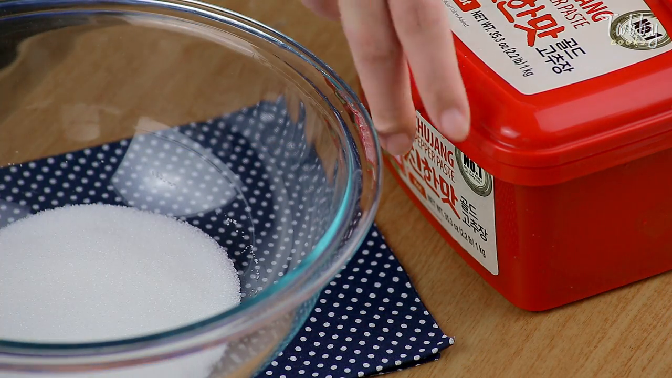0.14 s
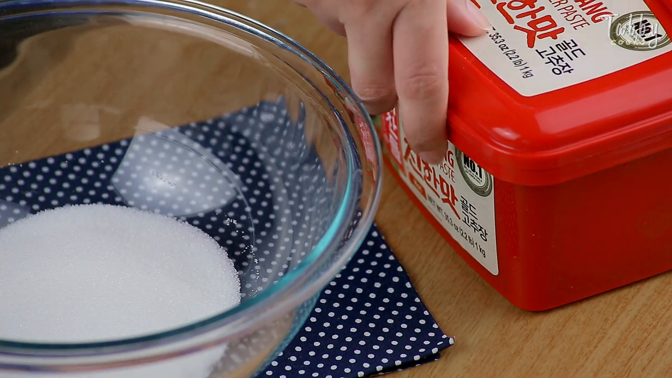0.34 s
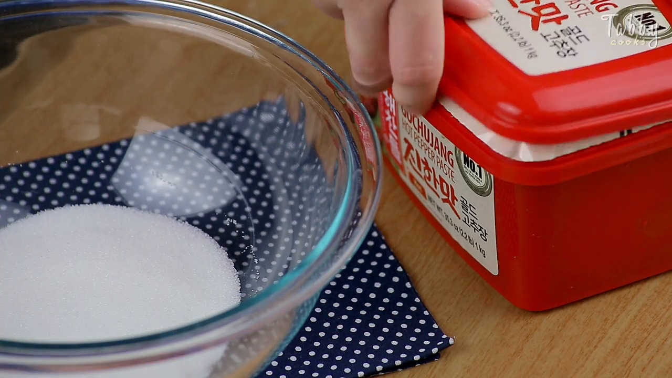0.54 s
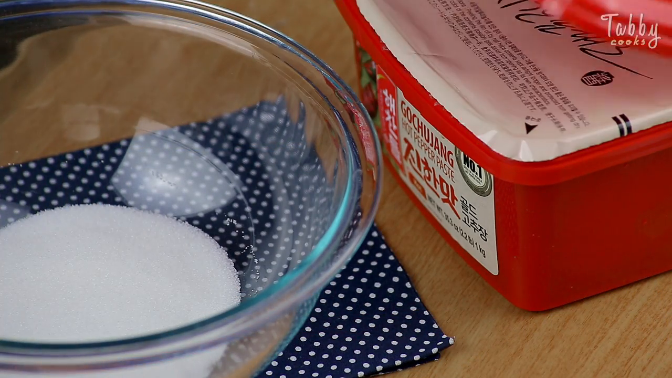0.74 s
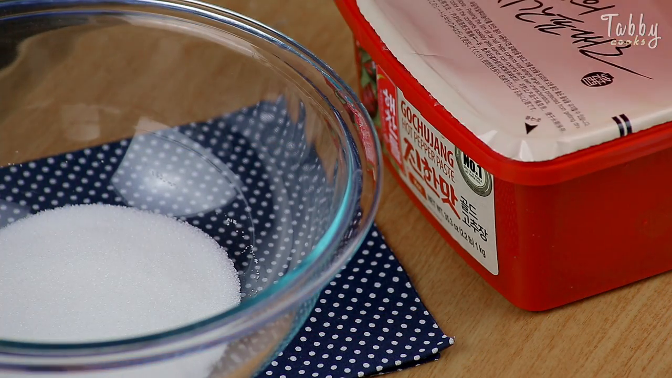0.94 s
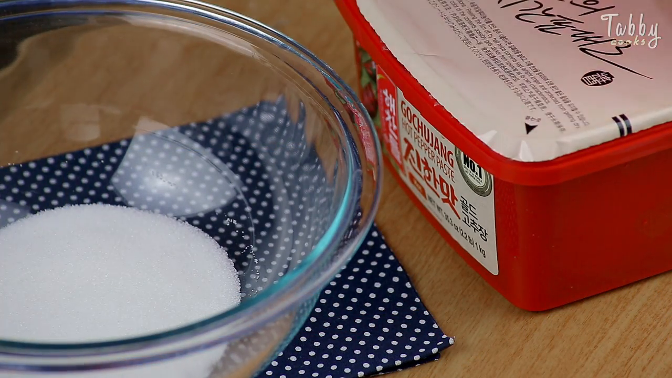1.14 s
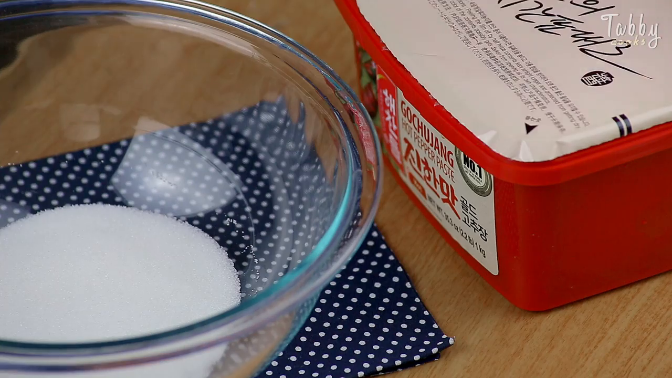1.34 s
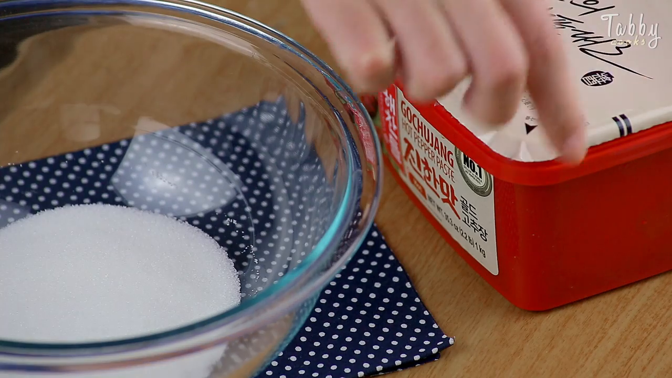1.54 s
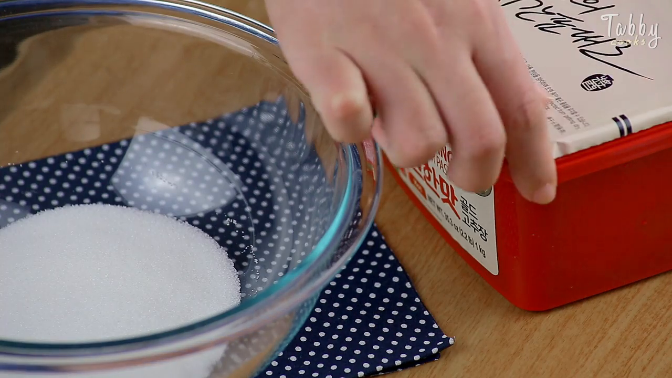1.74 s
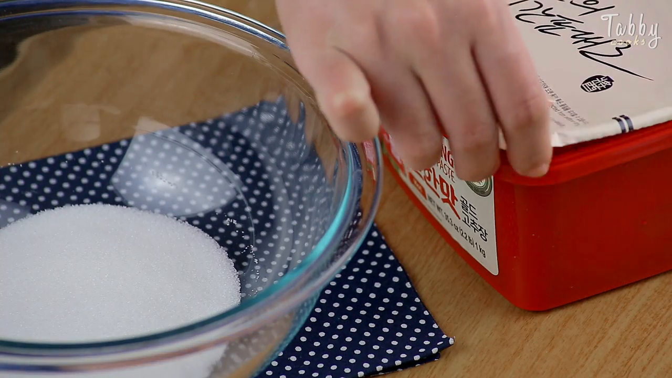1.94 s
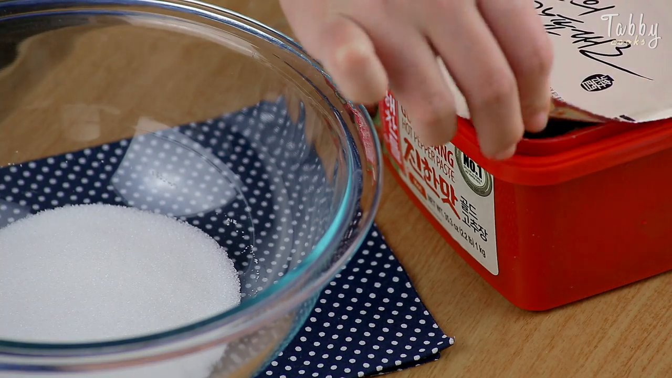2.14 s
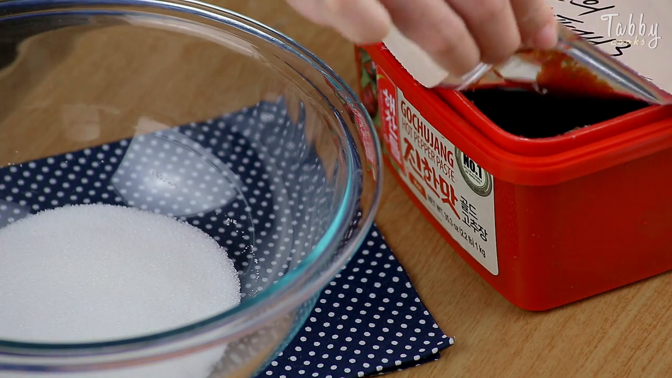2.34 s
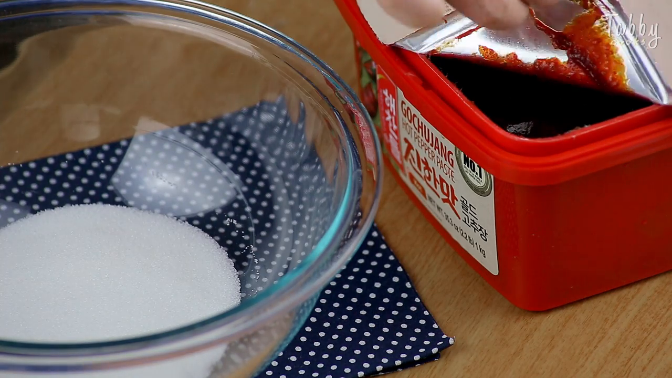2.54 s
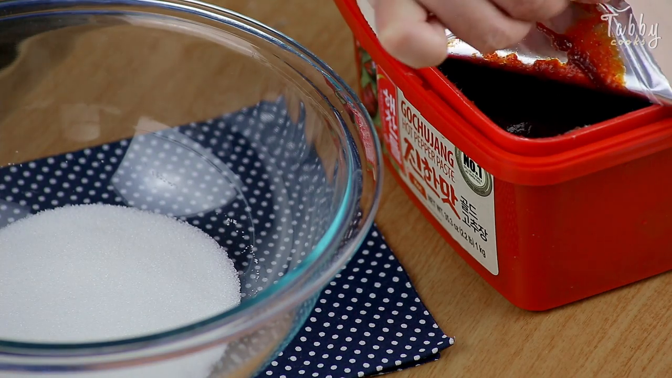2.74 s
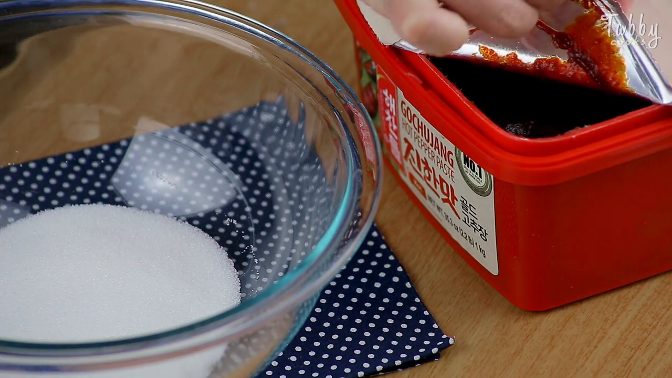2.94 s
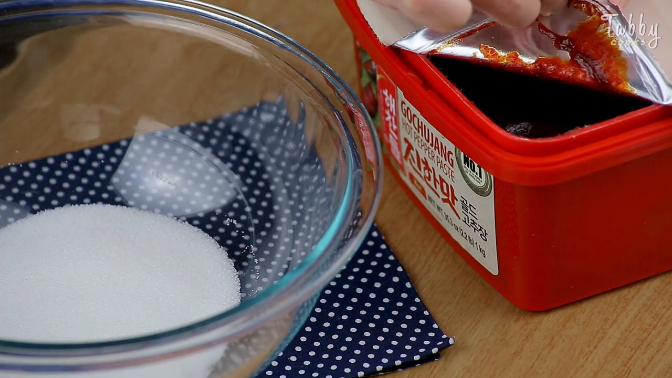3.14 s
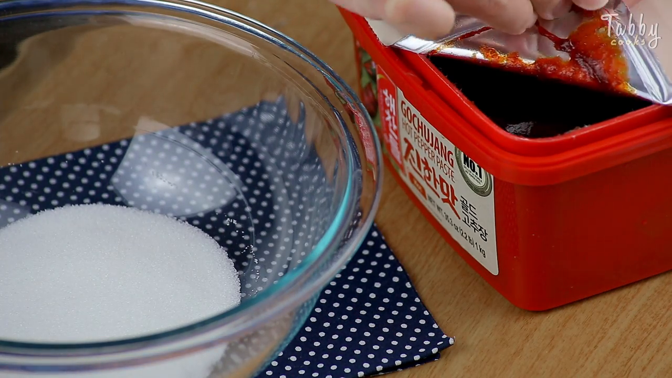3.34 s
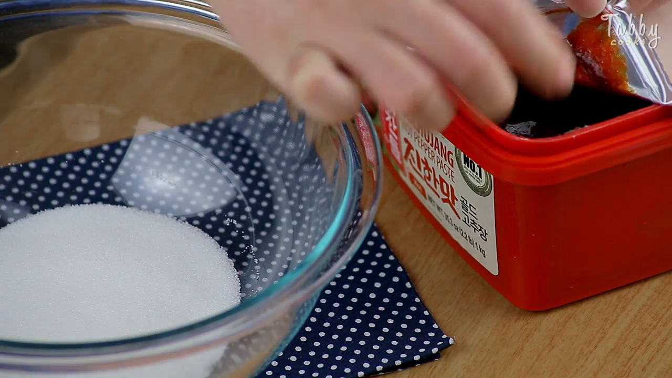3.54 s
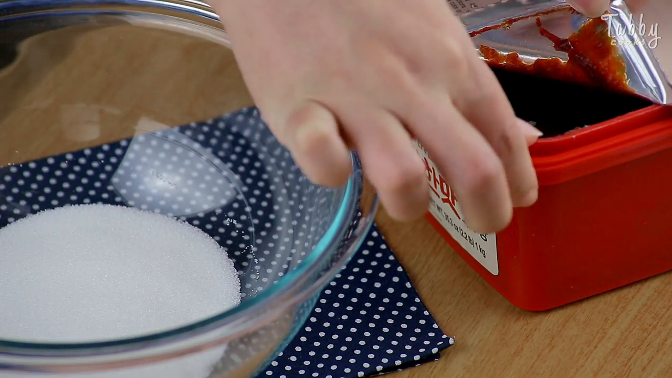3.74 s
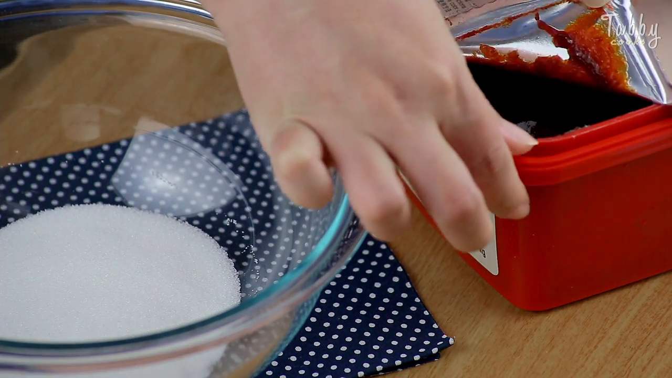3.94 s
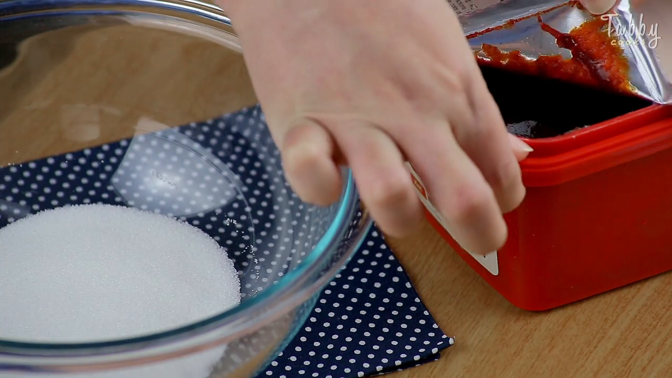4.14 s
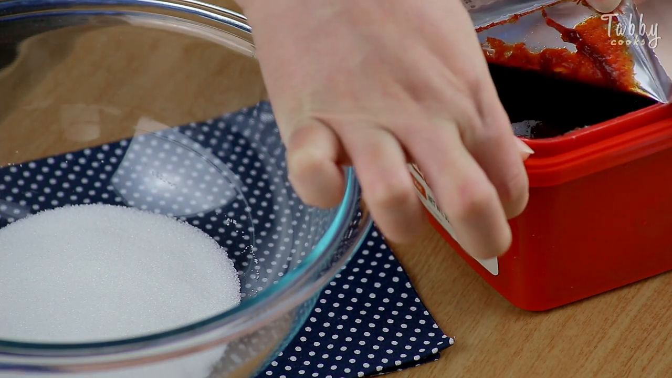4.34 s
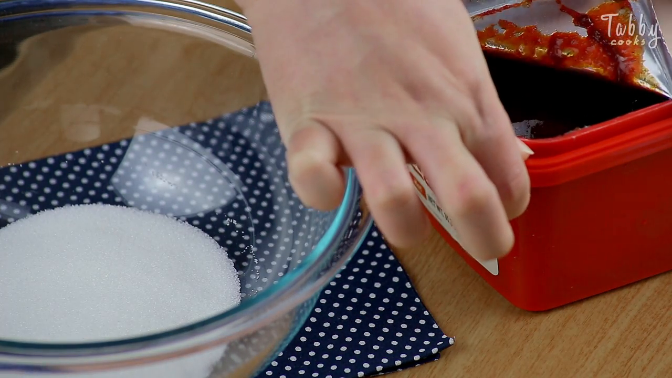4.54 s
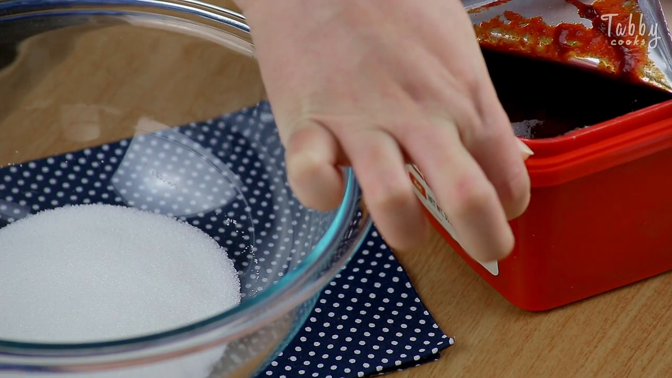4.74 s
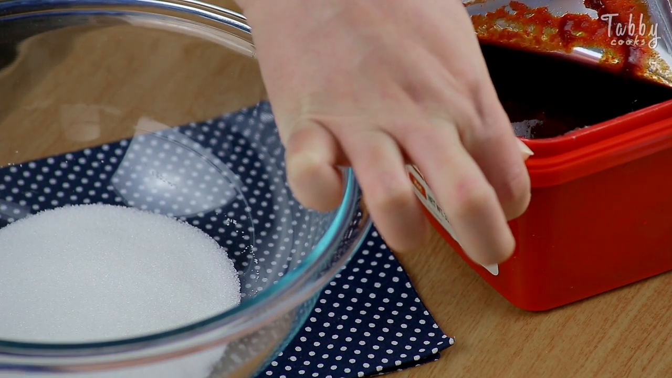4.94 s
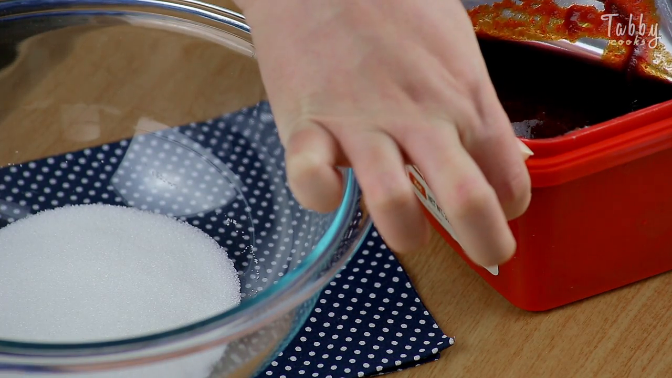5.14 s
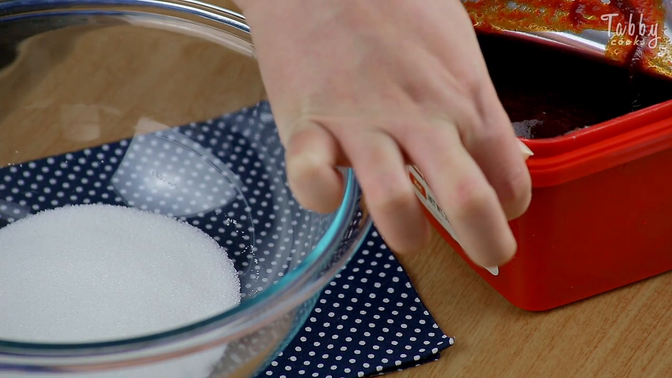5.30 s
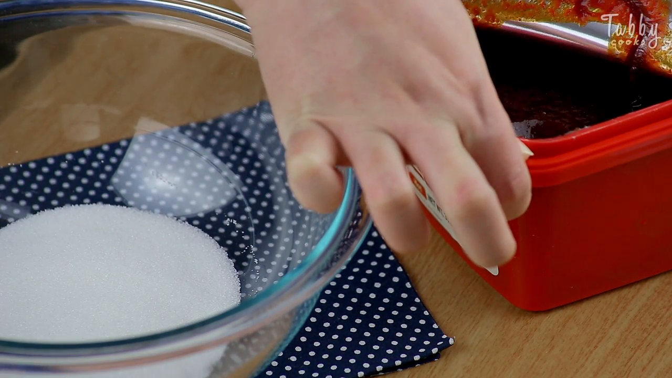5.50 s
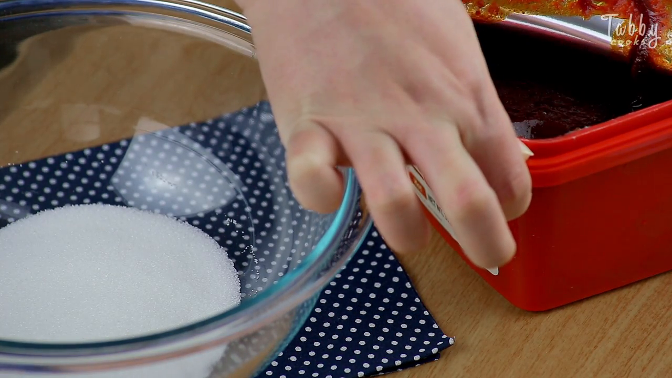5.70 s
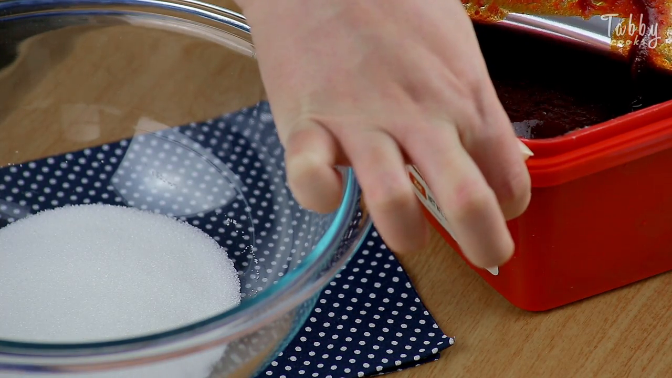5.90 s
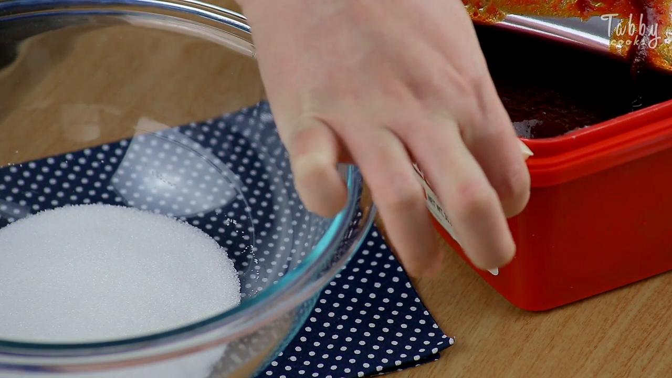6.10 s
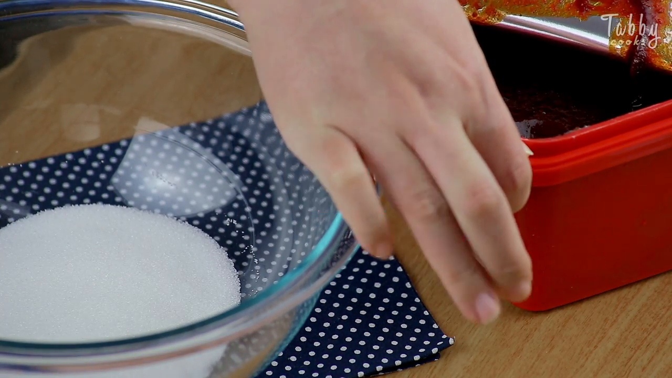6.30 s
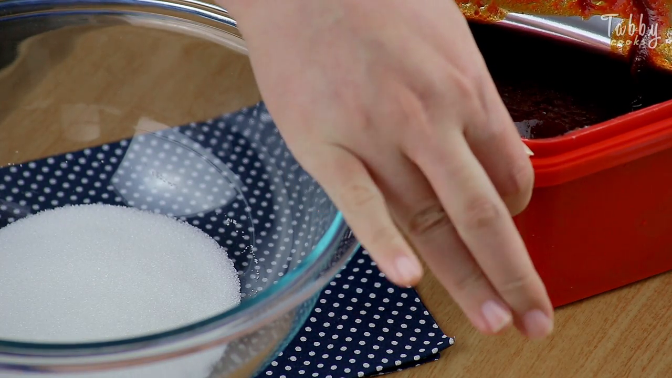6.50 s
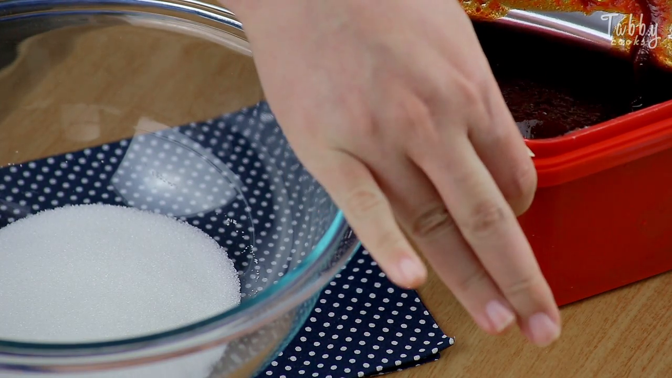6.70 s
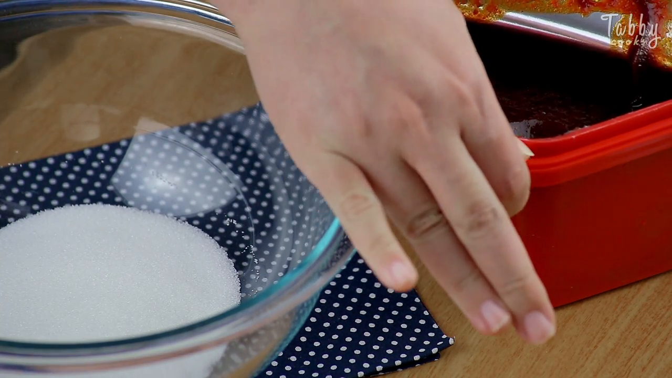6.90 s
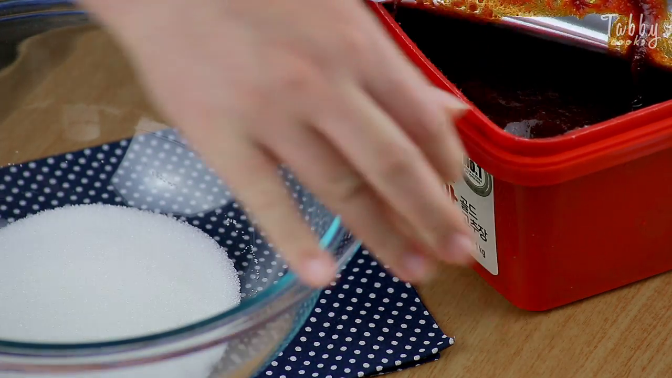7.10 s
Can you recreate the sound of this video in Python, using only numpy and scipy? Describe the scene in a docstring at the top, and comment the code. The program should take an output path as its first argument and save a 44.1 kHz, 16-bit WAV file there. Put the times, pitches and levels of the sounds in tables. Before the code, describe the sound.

A plastic tub is opened up close: the lid rubs off, then foil snaps loose and crinkles in tugs over dull table bumps.

```python
"""Unsealing a plastic tub

Close up on a kitchen table, a lid slides off with a hiss and a groan, and fingers pick at the rim.
The foil seal snaps loose and peels back in crackling tugs while the tub's walls flex and knock.
Every push thumps the table, which sways and booms underneath; a small room answers."""
import sys
import numpy as np
from scipy import signal
from scipy.fft import rfft, irfft, next_fast_len
from scipy.io import wavfile
from scipy.ndimage import uniform_filter1d

SR = 44100
rng = np.random.default_rng(int(sys.argv[2]) if len(sys.argv) > 2 else 0)


def unload_wav(signal):
    """Save mono or channel-first audio to the path in sys.argv[1] as 16-bit WAV at rate SR, clipped to [-1, 1]."""
    wavfile.write(
        sys.argv[1],
        SR,
        np.round(np.clip(np.atleast_2d(signal).T, -1, 1) * 32767).astype(np.int16),
    )


N = 315749

# colour of the room tone: freq_hz, gain_db
ROOM_TONE_EQ = [(59, -43), (100, 0), (124, -1), (166, -11), (215, -13.5), (621, -20.5), (950, -19),
                (1150, -21.5), (2690, -21), (3320, -36), (16000, -46)]
# fader moves of the faint opening hiss: time_s, gain_db
HISS_FADE = [(0, -82), (1.1, -77.5), (1.7, -87)]
# colour of that hiss: freq_hz, gain_db
HISS_EQ = [(2000, -20.5), (3500, -2.5), (8000, -6.5), (16000, -12)]
# how hard the hands keep the table trembling between pushes: time_s, strength_db
TREMBLE = [(0, -56.5), (.22, -58), (.4, -38.5), (.95, -39.5), (1.2, -50.5), (1.62, -55.5), (1.85, -38),
           (2.3, -51), (2.68, -34.5), (3.3, -54), (3.7, -41.5), (4.2, -33), (4.5, -24), (5.65, -27.5),
           (6.1, -37), (6.6, -42.5), (6.78, -29.5), (7.16, -31)]
# pushes that thump the table: start_s, strength_db, hardness_db (offset for the upper ring)
PUSHES = [(.3, -34.5, 8), (.54, -47, 3), (.61, -42, 12.5), (.88, -34, -10), (1.759, -39, 4),
          (2.04, -35, 6.5), (2.29, -40, 2), (2.401, -35, 5), (2.533, -20, 1), (2.963, -23, -3),
          (3.45, -42, 2.5), (3.66, -36, 5), (3.814, -29, 5.5), (3.87, -22.5, -3.5), (4.41, -20.5, -3),
          (4.691, -22.5, -6.5), (4.91, -40, -6), (5.102, -15, -4.5), (5.289, -21.5, -4), (5.533, -16.5, -7),
          (6.899, -32, 10), (7.02, -46, 8)]
# sub-bass sway of the table legs: freq_hz, gain_db
LEGS_EQ = [(8, -20.5), (18, -5.5), (25, -6), (29, -3), (34, -9), (44, -22.5), (70, -61), (120, -120)]
# boom and upper ring of the table top: freq_hz, gain_db
TABLE_TOP_EQ = [(30, -43), (45, -14.5), (56, 2.5), (66, 2.5), (74, 2.5), (88, -4.5), (104, -22),
                (155, -13.5), (174, -8), (192, -23.5), (340, -33), (520, -41.5), (900, -120)]
# fingers, lid and foil sliding on each other: start_s, length_s, gain_db, centre_hz
RUBS = [(.27, 0.09, -51.5, 4860), (.44, 0.081, -45.5, 5700), (.5, 0.13, -51, 5140),
        (.6, 0.081, -47.5, 4900), (.69, 0.14, -57.5, 4520), (1.705, 0.068, -64, 7000),
        (1.803, 0.059, -50.5, 6400), (1.88, .054, -62.5, 4100), (2.425, 0.051, -60.5, 4440),
        (2.83, 0.055, -62, 4300), (3.147, 0.042, -48.5, 5470), (3.205, 0.039, -45, 5500),
        (3.25, 0.07, -57.5, 4420), (3.32, 0.049, -55.5, 4680), (3.365, 0.085, -60.5, 5700),
        (3.66, 0.049, -57, 3860), (3.83, 0.12, -68, 5560), (3.96, 0.091, -75.5, 4920)]
# lid and fingertips juddering along the rim: start_s, length_s, gain_db, pitch_hz
JUDDERS = [(.28, 0.044, -55, 1770), (.297, .03, -36, 537), (.32, 0.1, -38.5, 162),
           (.505, 0.083, -34.5, 667), (.52, 0.132, -38.5, 157), (.53, 0.14, -46.5, 1860),
           (.56, 0.14, -40, 740), (.74, 0.074, -53, 1950), (1.755, 0.16, -44, 985),
           (2.21, 0.3, -50.5, 1250), (3.42, 0.12, -50, 907), (3.62, 0.33, -57.5, 1140)]
# ring of a rubbed surface: freq_hz, gain_db
SURFACE_EQ = [(2500, 1.5), (3400, 4.5), (4300, -2.5), (5500, 4.5), (6200, -2), (7000, 3), (8500, -6.5),
              (9700, -1), (11000, -18.5), (16000, -4)]
# the thud, body, snap and fizz bands of a click: low_hz, high_hz
CLICK_BANDS = [(220, 700), (700, 2800), (2800, 8000), (8000, 16000)]
# knocks of the tub: time_s, body_db, weight_db (thud over body), hardness_db (snap over body), panel_hz
TUB_KNOCKS = [(0.3147, -49.5, 1.5, 10.5, 577), (0.3204, -46, 15.5, -11, 505), (0.4553, -64.5, 13, 27, 740),
              (0.51, -44, 10, -1, 580), (0.5174, -50, 10, 24.5, 594), (.536, -32.5, -1, -18, 593),
              (.6216, -40, -1.5, 6.5, 1370), (0.649, -40, -8, -14, 1790), (0.6585, -34.5, -17, 7.5, 1970),
              (0.7601, -43, -10, 0.5, 2030), (1.7648, -31, -7, -54, 884), (1.7806, -33.5, -3, -61, 800),
              (1.858, -32, -10.5, -17, 1000), (1.908, -23.5, -20, -33, 1007),
              (2.0069, -19.5, -15, -5.5, 1376), (2.051, -33.5, -1, -5, 850), (2.068, -24, -11, -14, 1020),
              (2.2104, -33.5, -13, -22, 905), (2.2439, -30.5, -12, -16.5, 1410),
              (2.2695, -19, -12.5, -5, 1282), (2.3014, -33, -20, -35, 1550),
              (2.3493, -31, -4.5, -7.5, 1560), (2.403, -42, 1.5, -20, 1000),
              (2.4784, -17.5, -16.5, -12, 1850), (2.519, -26, 0.5, 8.5, 1996),
              (2.544, -27.5, -4.5, -2.5, 1654), (2.8413, -32, -22, -1, 1995), (2.8815, -45.5, -28, 4, 2400),
              (2.9257, -28.5, -5, 1, 1674), (2.976, -25.5, -7.5, -11, 1413),
              (3.1047, -40.5, -15, -25, 1070), (3.4457, -19, -10.5, -5.5, 1290),
              (3.471, -38, -4.5, -13.5, 1370), (3.616, -40, -15, -17.5, 1250), (3.643, -39, -4.5, -17, 920),
              (3.691, -35, -1, 2, 1210), (3.8051, -31, -27, -14.5, 1290), (3.8383, -39.5, -3, -9, 1096),
              (3.8869, -31, -15, -19, 1198), (4.3339, -19, -2, -29, 1516), (4.3946, -27.5, 0, -18, 1730),
              (4.434, -16, -8.5, -10.5, 1740), (4.5262, -29, -20, -14, 1500), (4.5478, -30, -10, -18, 1270),
              (4.6952, -35.5, 4.5, 4, 1520), (5.0922, -27, 0.5, -20, 1515), (5.2664, -26.5, -14, -15, 1390),
              (5.532, -27.5, -3, -2, 1614), (5.6711, -25, -18, -5.5, 1214), (5.9998, -53.5, 1.5, -23, 940),
              (6.317, -52.5, -9, -31, 1240), (6.9007, -16, -9, -14.5, 1665),
              (7.0044, -40.5, -4, -14.5, 1340), (7.0204, -20.5, -4, -28, 1443),
              (7.0352, -24.5, -35, -9, 1260), (7.0855, -38.5, -21, -15.5, 1305)]
# modes of a tub wall: panel_pitch_ratio, gain_db, t60_s
WALL_MODES = [(.21, -13.5, 0.022), (.31, -16, 0.004), (0.428, -20.5, 0.011), (.63, -6, .015),
              (.78, -1.5, 0.0098), (0.902, 3, 0.021), (1.022, 0.5, 0.015), (1.2, -0.5, 0.014),
              (1.38, 4, 0.0071), (1.7, -14.5, 0.0098), (2.15, -12, 0.027), (2.701, -3.5, 0.016),
              (4.6, -6.5, 0.0029)]
# the seal lets go or the foil buckles: time_s, snap_db, body_db (the whole sheet, relative to the snap)
FOIL_SNAPS = [(2.008, -24, -11.5), (2.2695, -33.5, -8), (2.519, -24, -5.5), (3.4457, -30.5, -4.5),
              (4.2531, -40.5, -6.5), (4.2827, -44.5, -16), (4.3022, -41, -2.5), (4.3091, -38.5, -6),
              (4.3891, -33, 2), (4.416, -33.5, -3), (4.494, -36.5, -7), (4.5046, -38.5, 3),
              (4.5464, -38.5, -2), (4.5677, -39, -9), (4.6813, -37, -14), (4.6921, -28.5, -3),
              (4.7262, -35.5, -16), (4.8436, -32, -3), (4.8725, -42, -24), (4.8808, -38, -18),
              (4.901, -38.5, -2), (4.9408, -40, -9), (5.0045, -52.5, -2), (5.0545, -39, -23),
              (5.0766, -37.5, -9), (5.0904, -26.5, -33), (5.121, -38, -8), (5.1336, -32.5, -15),
              (5.1416, -37.5, -3.5), (5.2096, -37.5, 2), (5.2403, -37.5, -20), (5.2815, -28.5, -4.5),
              (5.293, -36.5, -2), (5.3303, -34.5, -8), (5.417, -56, -16), (5.431, -36.5, -21),
              (5.4864, -46, -24), (5.498, -47.5, -3), (5.5215, -32.5, -7.5), (5.526, -27.5, -6),
              (5.588, -38.5, 3), (5.6097, -33.5, -3.5), (5.632, -37.5, -13), (5.6705, -41.5, -7),
              (5.7641, -32, -8), (6.5984, -44, -18.5), (6.7362, -45, -10.5)]
# modes of the taut foil: pitch_hz, gain_db, t60_s
FOIL_MODES = [(1187, -15.5, 0.066), (1820, -10.5, 0.045), (2500, -12, .007), (4400, -8, 0.0075),
              (5700, -9, 0.0071), (7450, -2.5, .002)]
# a bright, fizzy tail dying away after the sharp cracks: start_s, level_db, t60_s
SNAP_TAILS = [(2.011, -35, 0.27), (2.271, -53.5, 0.32), (2.523, -30, .25), (3.447, -52, 0.45)]
# pulls on the foil: start_s, length_s, crackle_db
TUGS = [(4.228, 0.089, -64.5), (4.36, 0.26, -50.5), (4.478, 0.072, -44.5), (4.656, 0.093, -44),
        (4.811, 0.17, -48.5), (5.033, 0.15, -53), (5.179, 0.17, -51), (5.41, .08, -74),
        (5.508, 0.18, -49.5), (6.722, 0.07, -66)]
# colour of the snap tails and the peeling crackle: freq_hz, gain_db
CRACKLE_EQ = [(400, -12.5), (1000, 0.5), (1800, 3.5), (2900, -8.5), (4500, -0.5), (6000, -3.5), (9000, -7),
              (12000, -18), (16000, -20.5)]
# reverb tail of the kitchen: freq_hz, t60_s
KITCHEN_DECAY = [(200, 0.17), (1500, 0.2), (5000, 0.19), (9000, 0.07), (15000, 0.089)]
# gentle treble shelf on the whole mix: freq_hz, gain_db
MASTER_EQ = [(13000, 0), (15500, -3)]

BAND_LIMIT_HZ = 15750
LID_OFF_S = 0.8
BOOM_RISE_S, BOOM_T60_S = 0.018, 0.37  # the table top answers a push quickly
SWAY_RISE_S, SWAY_T60_S = 0.049, 0.49  # the legs take longer to swing and to settle
LEAN_BOOM_DB, LEAN_HARDNESS_DB = -13, -4  # tremble in the table top; soft resting fingers ring it less
UPPER_RING_HZ = 115  # crossover from boom to upper ring
TUB_FIZZ_DB, FIZZ_PER_HARDNESS = -22, 0.6  # fizz under the snap; harder contacts keep more (dB per dB)
FOIL_THUD_DB, FOIL_FIZZ_DB = -13, -4.5  # thud under the body, fizz under the snap
PULL_SIZZLE_DB = -9.5  # fine sizzle under the ticks of a pull


def amp(db):
    """Decibels to gain."""
    return 10 ** (np.asarray(db) / 20)


def unit(x):
    """Scale to rms 1."""
    return x / np.sqrt(np.mean(x ** 2) + 1e-20)


def along(points, hz):
    """Read a (freq_hz, value) curve on a log frequency axis."""
    freqs, values = np.transpose(points)
    return np.interp(np.log(hz + 1), np.log(freqs + 1), values)


def fader(rows, **ends):
    """Gain per sample from (time_s, gain_db) rows."""
    return amp(np.interp(np.arange(N) / SR, *np.transpose(rows), **ends))


def filtered(x, response):
    """Run x through a filter given as a function of frequency."""
    size = next_fast_len(len(x) + 8192)
    return irfft(rfft(x, size) * response(np.fft.rfftfreq(size, 1 / SR)), size)[:len(x)]


def shaped(x, eq):
    """Colour x with an EQ curve, at rms 1."""
    return unit(filtered(x, lambda hz: amp(along(eq, hz))))


def resonance(hz, centre, q):
    """A causal band-pass."""
    return 1j * hz * centre / q / (centre ** 2 - hz ** 2 + 1j * hz * centre / q)


def causal(gain):
    """Minimum-phase response with this magnitude: nothing sounds before the blow."""
    cepstrum = irfft(np.log(np.maximum(gain, 1e-6)))
    half = len(cepstrum) // 2
    return np.exp(rfft(np.r_[cepstrum[0], 2 * cepstrum[1:half], np.zeros(half)]))


def add(track, start_s, x):
    """Mix x into the track at start_s."""
    part = track[max(round(start_s * SR), 0):][:len(x)]
    part += x[:len(part)]


def grains(size, rate, spread_db):
    """Tiny random impulses of very unequal strength, rate a second."""
    impulses = (rng.random(size) < rate / SR) * rng.standard_normal(size)
    return impulses * amp(spread_db * rng.standard_normal(size))


def background():
    """A bed of dull room tone, with a faint hiss over the opening."""
    tone = amp(-65.5) * shaped(rng.standard_normal(N), ROOM_TONE_EQ)
    hiss = fader(HISS_FADE, right=-120) * shaped(rng.standard_normal(N), HISS_EQ)
    return tone + amp(5.5) * hiss


def shaking(rise_s, t60_s, lean_db, upper=False):
    """Envelope of a table motion: each push swells and dies over the tremble of resting hands."""
    power = (amp(lean_db) * fader(TREMBLE)) ** 2
    t = np.arange(SR) / SR
    swell = np.minimum(t / rise_s, amp(-60 * (t - rise_s) / t60_s))
    for start_s, strength_db, hardness_db in PUSHES:
        add(power, start_s, (amp(strength_db + hardness_db * upper) * swell) ** 2)
    return np.sqrt(power)


def ringing(eq, smooth_s):
    """A low ring of steady strength and wandering phase: noise levelled by its own envelope."""
    noise = shaped(rng.standard_normal(N), eq)
    envelope = abs(signal.hilbert(noise, next_fast_len(N))[:N])
    power = uniform_filter1d(envelope ** 2, int(smooth_s * SR))
    return unit(noise / np.sqrt(abs(power) + 1e-6))


def table_rumble():
    """The table sways on its legs and its top booms; hard pushes bring out its upper ring."""
    sway = shaking(SWAY_RISE_S, SWAY_T60_S, lean_db=1) * ringing(LEGS_EQ, smooth_s=0.28)
    top = ringing(TABLE_TOP_EQ, smooth_s=0.031)
    lows = filtered(top, lambda hz: 1 / (1 + (hz / UPPER_RING_HZ) ** 12))
    boom = shaking(BOOM_RISE_S, BOOM_T60_S, LEAN_BOOM_DB) * lows
    ring = shaking(BOOM_RISE_S, BOOM_T60_S, LEAN_BOOM_DB + LEAN_HARDNESS_DB, upper=True) * (top - lows)
    rumble = amp(-3) * sway + amp(-1) * (boom + ring)
    return rumble * signal.windows.tukey(N, .003)


def strokes(rows, rate, spread_db, q, taper, squeak_db, points=60):
    """Each stroke is a swell of tiny slips through a resonance, with squeaky peaks of its own."""
    out = np.zeros(N)
    for start_s, length_s, gain_db, centre_hz in rows:
        size = int((length_s + 0.0097) * SR)
        peaks = np.c_[np.linspace(0, BAND_LIMIT_HZ, points), squeak_db * rng.standard_normal(points)]
        skirts = lambda hz: 1 / (1 + (hz / (2 * centre_hz)) ** 8 + (0.54 * centre_hz / (hz + 1)) ** 6)
        surface = lambda hz: amp(along(SURFACE_EQ, hz) + along(peaks, hz)) * skirts(hz)
        slips = grains(size, rate, spread_db)
        scrape = filtered(slips, lambda hz: resonance(hz, centre_hz, q) ** 2 * surface(hz))
        add(out, start_s - .01, amp(gain_db) * unit(scrape) * signal.windows.tukey(size, taper))
    return out


def sliding():
    """Smooth rubs hiss; the slower stick and slip along the rim groans."""
    hiss = strokes(RUBS, rate=6000, spread_db=2.5, q=.8, taper=.8, squeak_db=3.5)
    groan = strokes(JUDDERS, rate=1200, spread_db=1, q=1.8, taper=.6, squeak_db=2)
    return amp(2.9) * hiss + amp(-4) * groan


def click(modes, band_db, knee_hz, crack_db, crack_t60_s, spike_db, scatter, rolloff, size=2048):
    """A sudden release: damped modes, a short crack and a spike, EQ'd towards four band levels."""
    t, hz = np.arange(size) / SR, np.fft.rfftfreq(size, 1 / SR)
    mode_hz, mode_db, t60_s = np.transpose(modes)[:, :, None]
    detune, strength = rng.standard_normal((2, len(modes), 1))
    polarity = rng.choice([-1, 1], mode_hz.shape)
    decay = amp(mode_db + 2 * strength - 60 * t / t60_s)
    hit = np.sum(polarity * decay * np.sin(2 * np.pi * mode_hz * (1 + scatter * detune) * t), axis=0)
    hit += amp(crack_db - 60 * t / crack_t60_s) * rng.standard_normal(size)
    hit[0] += amp(spike_db)
    spectrum = rfft(hit)
    knee_hz = np.clip(knee_hz, 1000, 3000)  # the body of the sound ends here
    for _ in range(2):  # the place and hardness of the contact set its colour
        energy = np.array([np.sum(abs(spectrum[(hz > lo) & (hz < hi)]) ** 2) for lo, hi in CLICK_BANDS])
        power = 2 * energy / size / (SR / 200)  # as if packed into 5 ms
        thud, body, snap, fizz = band_db - 10 * np.log10(power)
        fall = rolloff * min(fizz - snap, 0)  # a soft contact keeps falling towards the top
        eq = [(150, thud - 12), (300, thud), (480, thud), (850, body), (knee_hz, body),
              (3500, snap), (7000, snap + 0.096 * fall), (10000, fizz), (15000, fizz + fall)]
        spectrum = spectrum * causal(amp(along(eq, hz)))
    return irfft(spectrum)


def splinters(hit, gain_db, rate, lead_s, trail_s, size=3000):
    """A release is never single: tiny copies lead up to it and trail it. Returns sound, pre-roll s."""
    main = size // 4
    t = (np.arange(size) - main) / SR
    slips = grains(size, rate, spread_db=4) * np.exp(np.minimum(t / lead_s, -t / trail_s))
    slips *= amp(gain_db) / np.sqrt(rate * (lead_s + trail_s))
    slips[main] += 1
    return signal.fftconvolve(hit, slips), main / SR


def tub_knocks():
    """Plastic walls flex and snap, each at the pitch of the spot that is pressed."""
    out = np.zeros(N)
    for time_s, body_db, weight_db, hardness_db, panel_hz in TUB_KNOCKS:
        modes = np.array(WALL_MODES) * [panel_hz, 1, 1]
        fizz_db = hardness_db + TUB_FIZZ_DB + FIZZ_PER_HARDNESS * hardness_db
        band_db = body_db + np.array([weight_db, 0, hardness_db, fizz_db])
        knock = click(modes, band_db, knee_hz=1.27 * panel_hz, crack_db=6.5, crack_t60_s=0.017,
                      spike_db=19.5, scatter=0.05, rolloff=1.8)
        knock, preroll_s = splinters(knock, gain_db=-15, rate=4500, lead_s=.0014, trail_s=.011)
        if time_s < LID_OFF_S:  # the soft lid damps the very top
            knock = filtered(knock, lambda hz: 1 / (1 + (hz / 11500) ** 10))
        add(out, time_s - preroll_s, knock)
    return out


def foil_snaps():
    """The taut sheet lets go or buckles: sharp bright snaps, each in a shower of smaller ones."""
    out = np.zeros(N)
    for time_s, snap_db, body_db in FOIL_SNAPS:
        band_db = snap_db + np.array([body_db + FOIL_THUD_DB, body_db, 0, FOIL_FIZZ_DB])
        snap = click(FOIL_MODES, band_db, knee_hz=2230, crack_db=-5.5, crack_t60_s=0.0088,
                     spike_db=10, scatter=0.081, rolloff=0.89)
        snap, preroll_s = splinters(snap, gain_db=-3.5, rate=2600, lead_s=0.00078, trail_s=0.0056)
        add(out, time_s - preroll_s, snap)
    return out


def tails_and_peel():
    """A bright, fizzy tail dies away after the sharp cracks; on each pull the glue parts in tiny ticks."""
    tails, pull = np.zeros((2, N))
    t = np.arange(SR // 2) / SR
    for start_s, level_db, t60_s in SNAP_TAILS:
        add(tails, start_s, amp(level_db - 60 * t / t60_s))
    for start_s, length_s, crackle_db in TUGS:
        add(pull, start_s, amp(crackle_db) * signal.windows.tukey(int(length_s * SR), .5))
    fizz = shaped(grains(N, rate=8000, spread_db=3), CRACKLE_EQ)
    ticks = shaped(grains(N, rate=700, spread_db=4), CRACKLE_EQ)
    return (tails + amp(PULL_SIZZLE_DB) * pull) * fizz + pull * ticks


def kitchen(x, early_db, early_t60_s, late_db, pieces=24):
    """Table and tub scatter the sound at once, then the kitchen rings."""
    out, start = np.zeros(N), 0
    for piece in np.array_split(x, pieces):  # fresh reflections: the paths shift as the hands move
        hz, frame_s, noise = signal.stft(rng.standard_normal(SR // 3), SR, nperseg=256)
        decay = amp(-60 * frame_s / along(KITCHEN_DECAY, hz)[:, None])
        late = signal.istft(noise * decay, SR, nperseg=256)[1]
        t = np.arange(len(late)) / SR
        late = late * (t > .004)
        early = grains(len(t), rate=4500, spread_db=-2.5) * amp(-60 * t / early_t60_s) * (t > .0015)
        response = (amp(late_db) * unit(late) + amp(early_db) * unit(early)) / np.sqrt(len(t))
        add(out, start / SR, signal.fftconvolve(piece, response))
        start += len(piece)
    return out


def scene():
    """Close handling and its reverb over the table's rumble and the room tone, in mono."""
    hands = tub_knocks() + tails_and_peel() + sliding()
    reverb = kitchen(hands, early_db=-13, early_t60_s=0.03, late_db=-13)
    # the foil throws a different colour towards each of three walls
    foil_reverb = sum(kitchen(foil_snaps(), early_db=-17.5, early_t60_s=0.021, late_db=-20.5, pieces=8)
                      for _ in range(3))
    return (hands + foil_snaps() + reverb + foil_reverb + table_rumble() + background())[None]


def record(dry):
    """Soften the very top and cut steeply at the band limit."""
    response = lambda hz: amp(along(MASTER_EQ, hz)) / np.sqrt(1 + (hz / BAND_LIMIT_HZ) ** 120)
    return np.array([filtered(channel, response) for channel in dry])


dry = scene()
out = record(dry)
unload_wav(out)
```